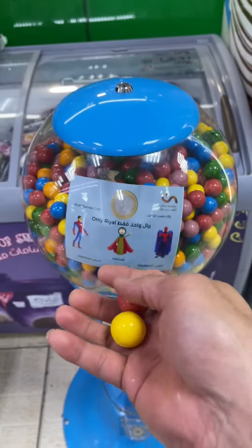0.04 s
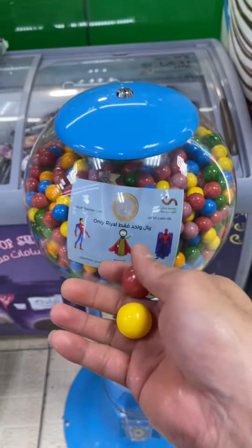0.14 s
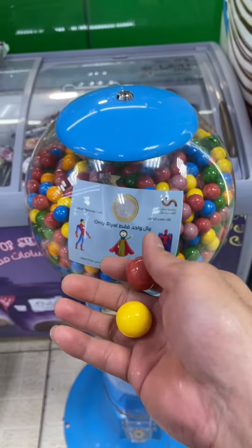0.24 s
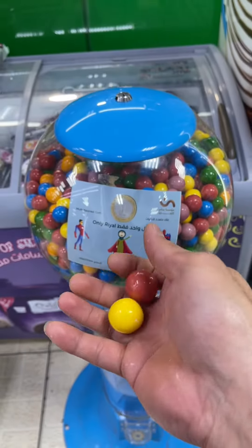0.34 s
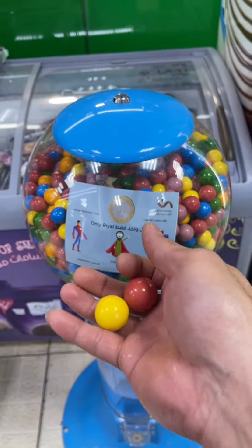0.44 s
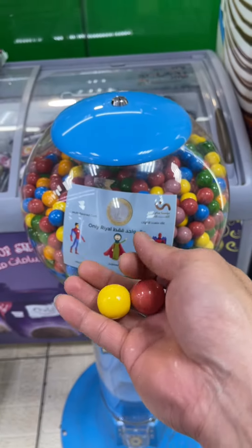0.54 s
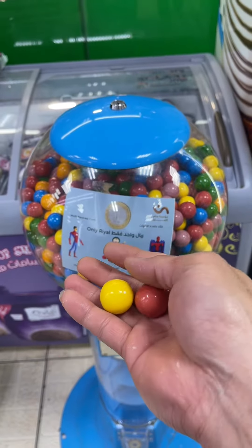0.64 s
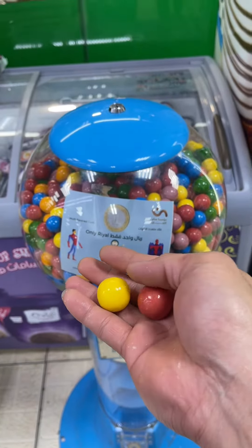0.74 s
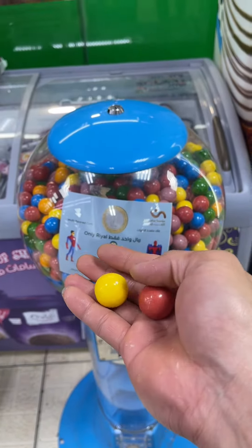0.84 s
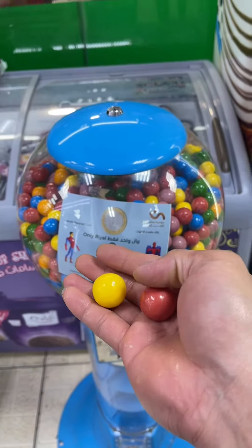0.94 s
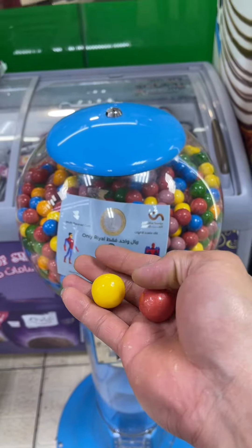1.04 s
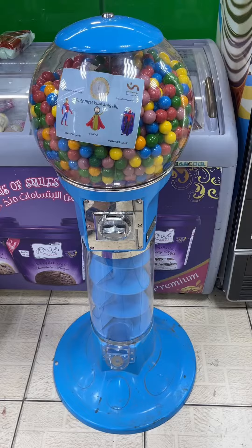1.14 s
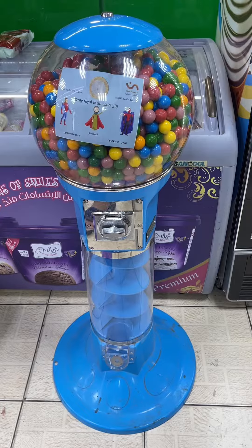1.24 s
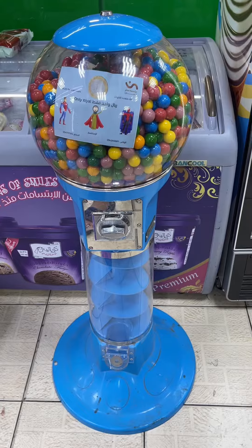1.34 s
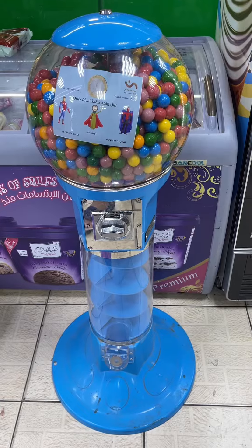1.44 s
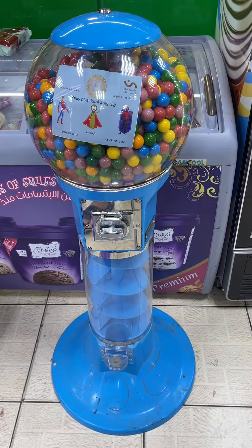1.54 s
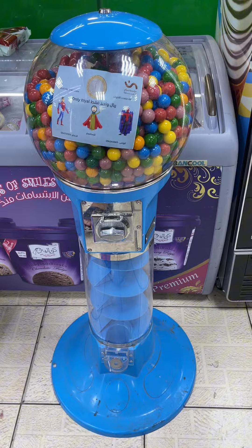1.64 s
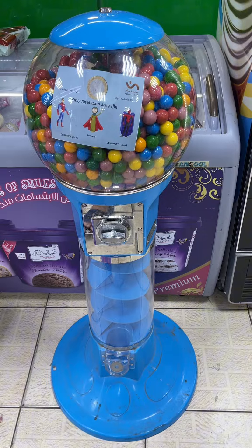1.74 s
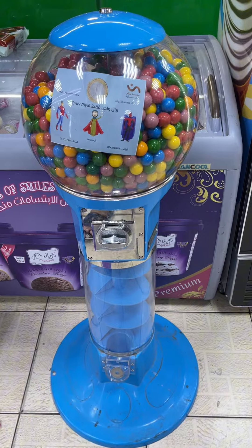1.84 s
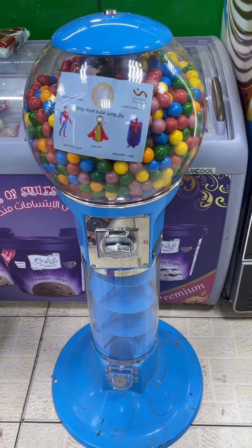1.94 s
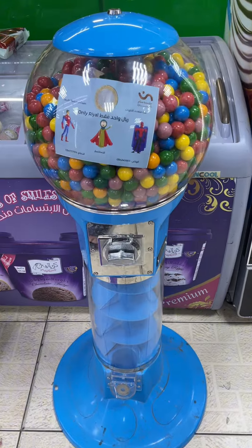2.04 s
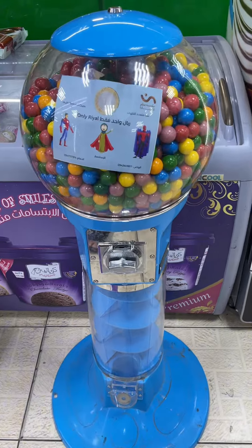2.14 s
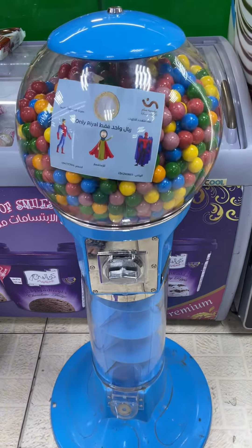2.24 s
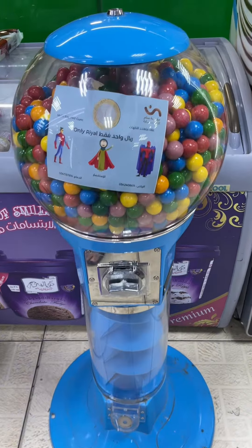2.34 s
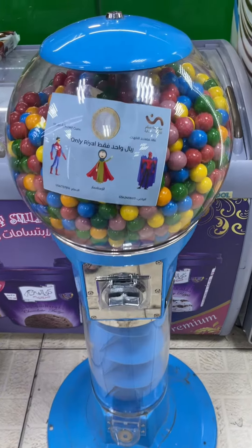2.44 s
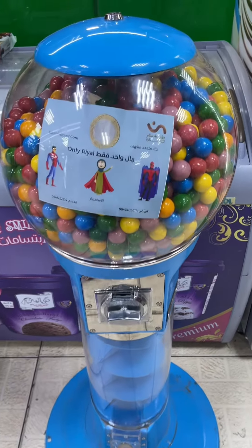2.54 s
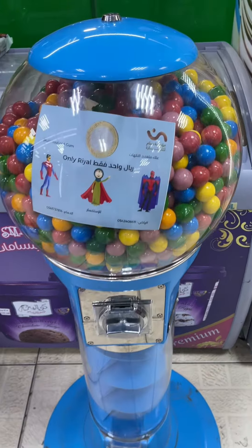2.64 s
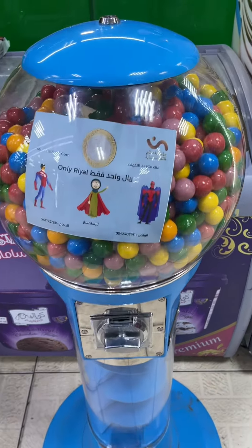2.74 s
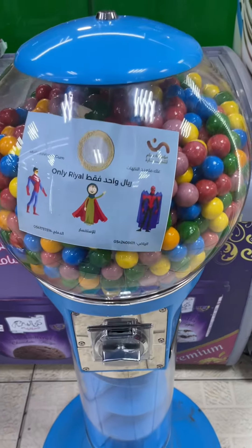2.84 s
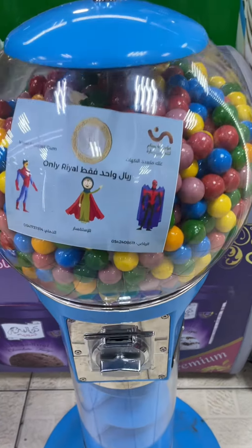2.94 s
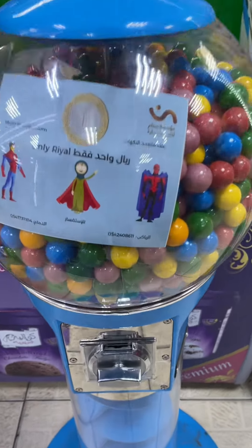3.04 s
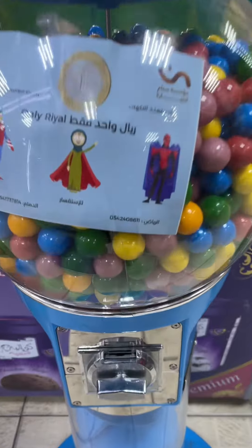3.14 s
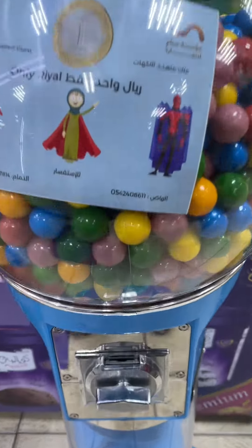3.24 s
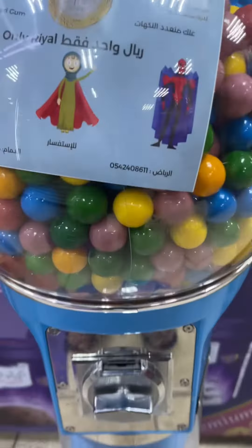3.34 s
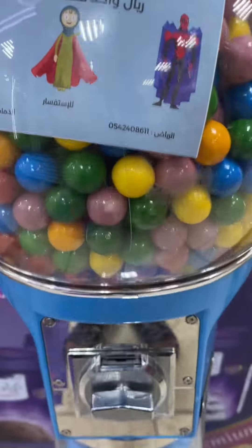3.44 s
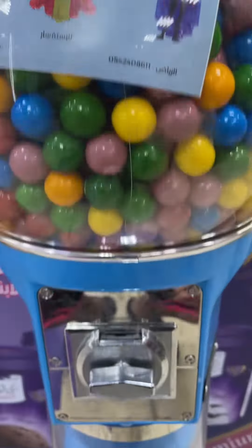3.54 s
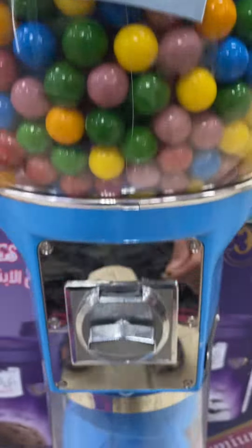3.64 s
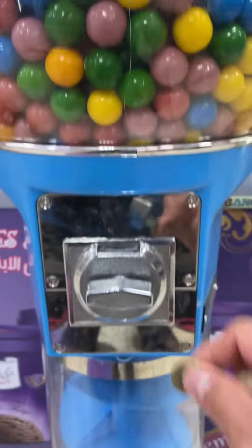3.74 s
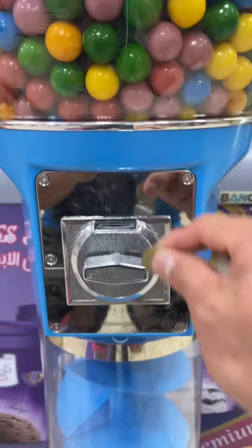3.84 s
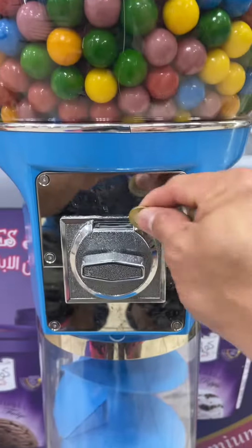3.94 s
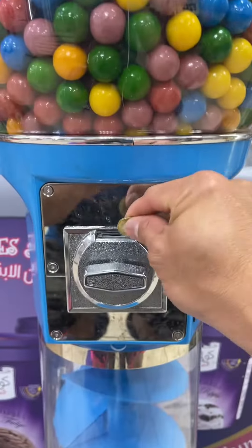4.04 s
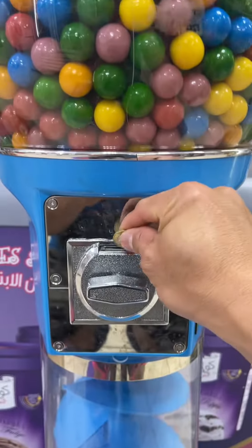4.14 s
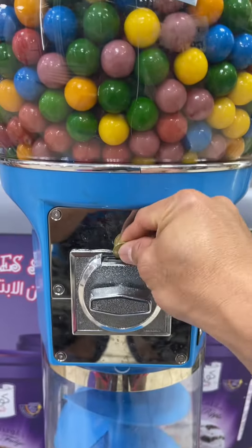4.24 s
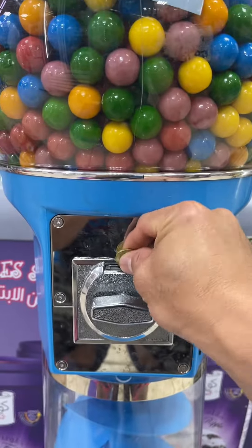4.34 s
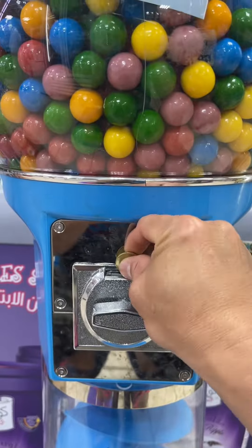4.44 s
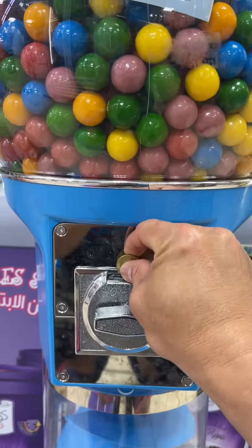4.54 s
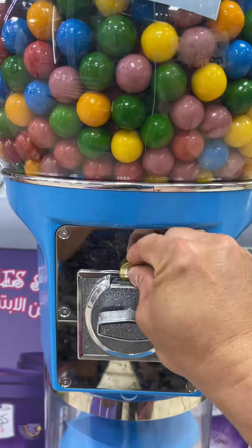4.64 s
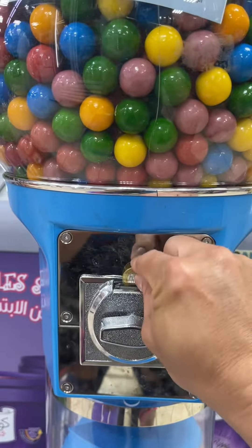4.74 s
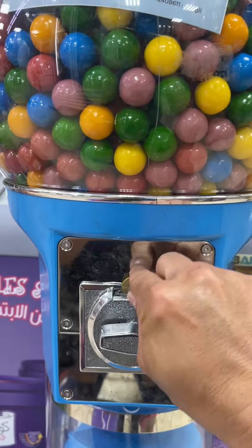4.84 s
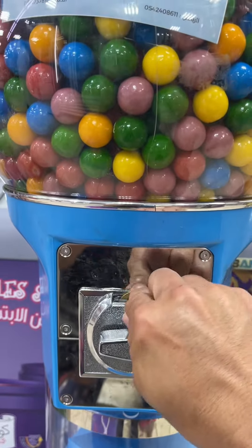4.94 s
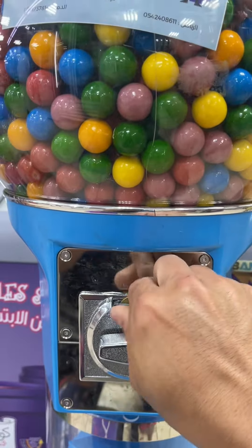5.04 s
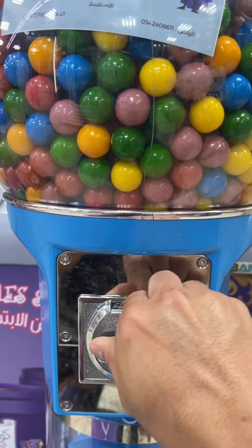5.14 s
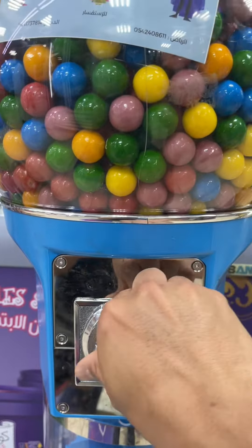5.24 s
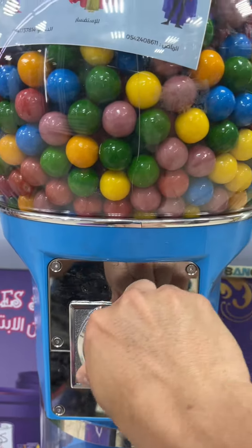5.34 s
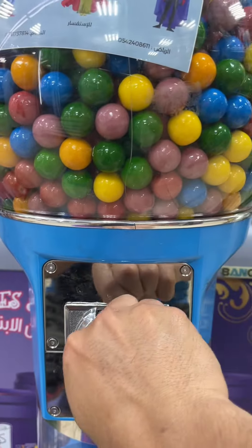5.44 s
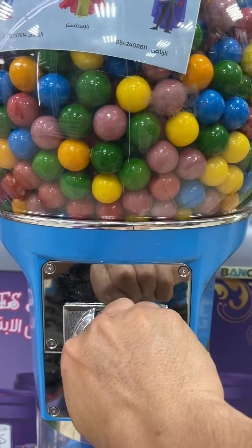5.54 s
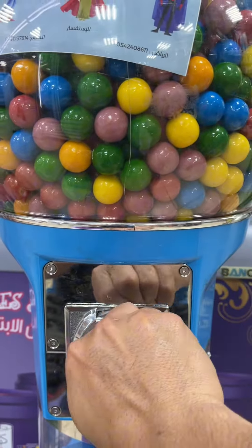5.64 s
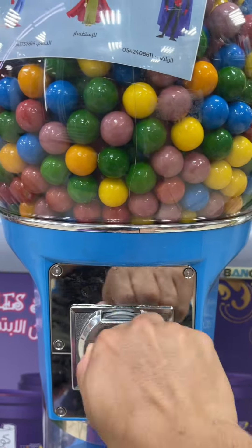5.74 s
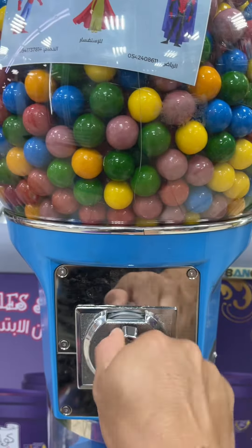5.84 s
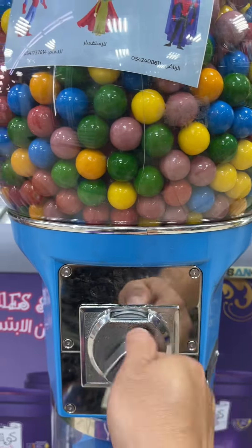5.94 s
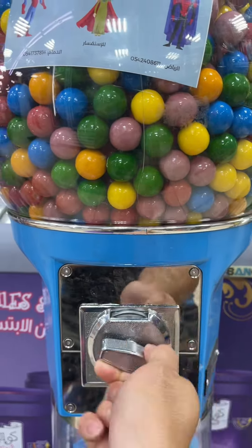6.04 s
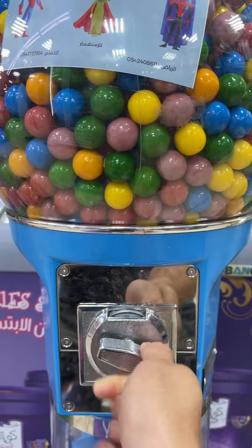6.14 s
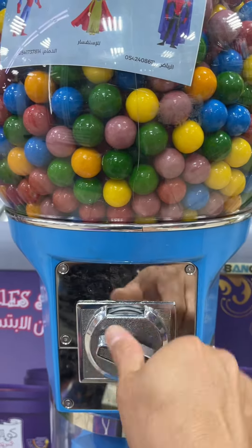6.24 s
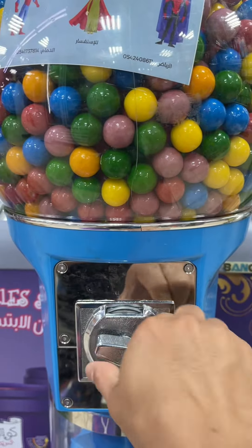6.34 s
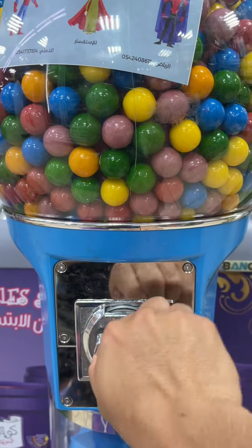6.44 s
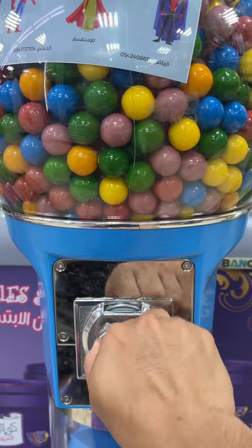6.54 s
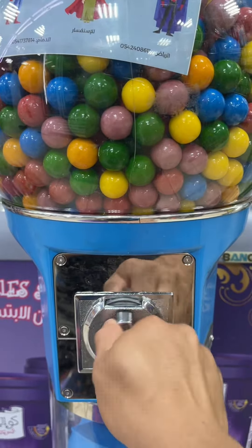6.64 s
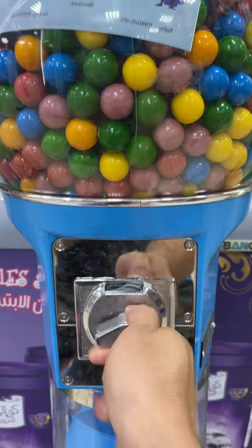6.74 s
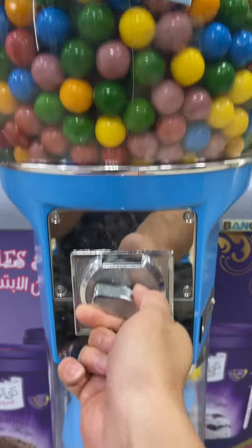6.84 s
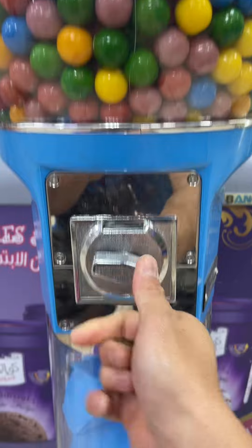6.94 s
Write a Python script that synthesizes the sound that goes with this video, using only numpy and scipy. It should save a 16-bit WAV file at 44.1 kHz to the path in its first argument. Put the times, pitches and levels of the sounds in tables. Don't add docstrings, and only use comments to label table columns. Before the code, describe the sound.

A low, beating freezer hum with cabinet rumble, soft air and thin fan whines runs throughout, heard on a close stereo phone in a small shop. From 0 to 0.7 s gumballs roll and clack in a palm, with dry skin swishes, a tiny squeak and bright ticks. Dull knocks come at 1.0, then an abrupt cut near 1.1 leaves the hum lower, slowly recovering. A loud hollow knock hits at 1.74, a bright coin chink at 2.12, and small ticks around 2.3 to 2.5. Faint handling follows, with plinks at 3.7. The coin taps the slot at 4.12 to 4.22 and lands with a hard clack at 4.83. Light plinks start at 5.3. From 5.6 the crank loads up; loud, bright ratchet snaps with housing clank and gritty scraping peak at 5.8 to 6.0, ease, return at 6.3, then run densest from 6.49 to 6.77 before dying away.

```python
import sys
import numpy as np
from scipy import signal
from scipy.fft import rfft, irfft
from scipy.io import wavfile
from scipy.ndimage import uniform_filter1d

SR = 44100
rng = np.random.default_rng(int(sys.argv[2]) if len(sys.argv) > 2 else 0)


def log_audio(samples):
    frames = np.atleast_2d(samples).T
    limited = np.clip(frames, -1, 1)
    pcm = np.round(limited * 32767).astype(np.int16)
    wavfile.write(sys.argv[1], SR, pcm)


def ratio(d):
    e = np.asarray(d, float) / 20
    return 10 ** e


N = 308700

# (frequency [Hz], density [dB/Hz])
GROWL = [(300, -4.5), (550, 5.5), (1100, 0.5), (1900, 0), (2800, -1), (4200, -8), (6500, -10.5)]
# (frequency [Hz], density [dB/Hz])
SCRAPE = [(3000, -24.5), (4200, -29.5), (6500, -31.5), (8800, -13.5), (10500, -16.5), (12000, -21.5),
          (14000, -38), (17000, -62)]
SHARED = np.array([[1], [0]])
LEAD_S = 0.006
CHANGE_S = 1.1


def on_hz(table, hz):
    f, v = np.transpose(table)
    return np.interp(np.log(hz + 1), np.log(f), v)


def tint(x, table):
    hz = np.fft.rfftfreq(x.shape[-1], 1 / SR)
    closed = [(0.92, -200)] + list(table) + [(SR, -200)]
    y = irfft(rfft(x) * ratio(on_hz(closed, hz)), x.shape[-1])
    return y / y.std()


def walk(rate_hz):
    k = int(SR / rate_hz)
    held = np.repeat(rng.standard_normal(N // k + 1), k)
    return 1.05 * uniform_filter1d(uniform_filter1d(held, k), k)[:N]


def grains(per_s, spread_db):
    contact = rng.random(N) < per_s / SR
    size = ratio(spread_db * np.minimum(rng.exponential(size=N), 3))
    return contact * size * rng.standard_normal((2, N))


def gestures(starts_s, holds_s, levels_db, rise_db_s, fall_db_s):
    t = np.arange(N) / SR
    on, hold, db = (np.array(c)[:, None] for c in (starts_s, holds_s, levels_db))
    rise_db = rise_db_s * np.maximum(on - t, 0)
    fall_db = fall_db_s * np.maximum(t - on - hold, 0)
    return ratio((db - rise_db - fall_db).max(axis=0))


def add(out, s, db, sound):
    i = int((s - LEAD_S) * SR)
    n = min(sound.shape[1], N - i)
    out[:, i:i + n] += sound[:, :n] * ratio(db + 3) / np.abs(sound).max(axis=1, keepdims=True)


def strike(modes, chatter_ms, crack, spread, crack_db, rattle_s=0.01, rattle_db=-60, size=4096):
    t = np.maximum(np.arange(size) / SR - LEAD_S, 0)
    axis = 2j * np.pi * np.fft.rfftfreq(size, 1 / SR)
    hz, db, t60_s = np.repeat(modes, 5, axis=0).T[:, :, None]
    luck = rng.standard_normal((3, len(hz), 1))
    pole = 2j * np.pi * hz * (1 + spread * luck[2]) - np.log(1000) / np.abs(t60_s)
    response = 2j * pole.imag / ((axis - pole.real) ** 2 + pole.imag ** 2)
    body = (ratio(db) * luck[:2])[:, :, 0] @ response
    rise = t / (max(chatter_ms, 0.05) / 1000)
    force = (rise / 2 * np.exp(1 - rise / 2)) ** 2
    force = force + ratio(rattle_db) * np.minimum(rise, 1) * np.exp(-np.log(1000) * t / rattle_s)
    chatter = rng.standard_normal((2, size)) * rng.exponential(size=size) * force
    even = rfft(chatter)
    chatter = irfft(even / np.sqrt(uniform_filter1d(np.abs(even) ** 2, size=size // 55) + 1e-18))
    rung = irfft(rfft(chatter) * body * -1j)
    cracked = tint(chatter, crack)
    return rung / np.abs(rung).max() + ratio(crack_db) * cracked / np.abs(cracked).max()


def gain_control_db():
    # (deepest [s], depth [dB])
    ducks = [
        (6.02, -5),
        (6.86, -10.5),
    ]
    attack_s, release_s = 0.09, 0.15
    drop_db, recover_s = -7.5, 1.32
    t = np.arange(N) / SR
    db = drop_db * (t > CHANGE_S) * np.exp(-np.maximum(t - CHANGE_S, 0) / recover_s)
    for s, depth_db in ducks:
        shape = np.minimum(1 + (t - s) / attack_s, 1 - (t - s) / release_s)
        db = db + depth_db * np.clip(shape, 0, 1)
    return db


def shop():
    # (frequency [Hz], zero phase [s])
    hums = [(59.04, 2.33), (58.57, 2.33), (117.18, 2.57), (119.96, 2.57), (113.96, 2.5)]
    # (level at start [dB], drift [dB/s])
    hum_db = [(-46, 0.9), (-38, -2.5), (-37, -2.5), (-36.5, -1.0), (-57, 0.45)]
    # (frequency [Hz], density [dB/Hz])
    air_colour = [(25, -70), (33, -70), (45, -61), (85, -58), (200, -64), (330, -69.5), (700, -79.5),
                  (1200, -88.5), (2200, -91), (3300, -95.5), (4900, -100), (7500, -98), (10500, -98),
                  (11600, -103), (12200, -124)]
    # (frequency [Hz], width [Hz], level [dB])
    whines = [(281, 24, -49), (540, 40, -66), (1320, 90, -65), (1890, 40, -71.5), (2280, 90, -72),
              (6030, 130, -64.5), (176, 9, -52), (233, 12, -53)]
    fan_on_s = 3.65
    skipped_s = -0.72
    t = np.arange(N) / SR
    shop_s = t + skipped_s * (t < CHANGE_S)
    held_db = gain_control_db()
    hum = 0
    for (hz, s), (db, drift) in zip(hums, hum_db):
        level_db = db + 1.5 + drift * t + 0.44 * held_db + 2.5 * walk(5.5)
        hum = hum + ratio(level_db) * np.sin(2 * np.pi * hz * (shop_s - s))
    out = SHARED * hum
    hz = np.fft.rfftfreq(N, 1 / SR)
    density = ratio(on_hz(air_colour, hz)) * np.sqrt(SR / 2)
    air = rfft(rng.standard_normal((2, N)))
    fans = rfft(rng.standard_normal((2, N)))
    swell_db = held_db + 1.5
    for centre in 20 * 2. ** np.arange(10):
        share = np.cos(np.pi / 2 * np.clip(np.log2((hz + 1) / centre), -1, 1)) ** 2
        follow = np.clip(1.2 - centre / 1500, 0.25, 1)
        out = out + ratio(follow * swell_db + 1.54 * walk(12)) * irfft(air * density * share, N)
    for k, (centre, width, db) in enumerate(whines):
        line = irfft(fans / (1 + (2 * (hz - centre) / width) ** 2), N)
        level_db = db + 2.0 * walk(4.1) + (1 if centre < 400 else 0.4) * held_db
        if k == 2:
            level_db = level_db + np.where(t < fan_on_s, -9.0, 0)
        out = out + ratio(level_db) * line / line.std()
    return out


def palm():
    # (time [s], level [dB], hold [s])
    strokes = [
        (0.0, -38.5, .004),
        (0.29, -52, 0.0091),
        (0.402, -38, 0.015),
        (0.503, -38.5, .004),
        (0.619, -36.5, 0.0065),
    ]
    # (time [s], level [dB], hold [s])
    shifts = [
        (2.97, -73, .004),
        (3.096, -63, .004),
        (3.655, -56, 0.065),
        (3.943, -65, 0.026),
        (4.11, -56, 0.029),
        (4.227, -62, .004),
        (4.535, -61, 0.017),
    ]
    # (frequency [Hz], density [dB/Hz])
    rub_colour = [(600, -8), (1200, -3), (2500, -3.5), (4500, -2.5), (7000, -1.5), (10500, 3.5),
                  (11700, -2.5), (12400, -20), (13200, -42)]
    # (on [s], off [s], level [dB])
    reach = (2.8, 8.6, -61.5)
    # (on [s], off [s], frequency [Hz], harmonic levels [dB])
    squeak = (.172, .245, 2990, [-60, -56, -53])
    t = np.arange(N) / SR
    start, level_db, hold = np.transpose(strokes + shifts)
    moving = gestures(start, hold, level_db, rise_db_s=900, fall_db_s=262)
    moving = moving + ratio(-54) * (t < CHANGE_S)
    reach_on, reach_off, reach_db = reach
    moving = moving + ratio(reach_db) * (t > reach_on) * (t < reach_off)
    rub = tint(grains(per_s=6800, spread_db=-2.0), rub_colour)
    swish = moving * ratio(0.5 + 3.4 * walk(52.8)) * rub
    on, off, hz, levels = squeak
    gate = np.clip(np.minimum(t - on, off - t) / 0.0083, 0, 1)
    tone = sum(ratio(db + 0.5) * np.sin(2 * np.pi * hz * (k + 1) * t) for k, db in enumerate(levels))
    return swish + SHARED * gate * tone


def thud(hz):
    sides = np.array([[1], [0.27]])
    cycles = np.maximum(np.arange(4096) / SR - LEAD_S, 0) * hz
    rise = cycles / 1.92
    return (rise * np.exp(-rise)) ** 3 * np.sin(2 * np.pi * (cycles + 0.27)) * sides


def small_hits():
    # (time [s], level [dB], frequency [Hz])
    knocks = [
        (0.996, -26.5, 540),
        (1.066, -30, 540),
        (1.734, -44, 563),
        (1.7424, -13.5, 580),
        (1.7525, -25, 550),
        (4.843, -35.5, 473),
    ]
    # (time [s], level [dB])
    knock_clicks = [
        (0.996, -32.5),
        (1.0655, -32.5),
        (1.742, -21.5),
    ]
    # (time [s], level [dB], frequency [Hz], t60
    # [s])
    plinks = [(0.0084, -28, 1580, 0.016), (0.0397, -45, 1560, 0.022), (2.3665, -51, 1350, 0.018),
              (3.6612, -35.5, 1690, 0.016), (3.711, -34, 1360, 0.014), (3.727, -44, 1510, 0.02),
              (5.305, -37.5, 1510, 0.01), (5.463, -43, 1540, 0.018), (5.549, -36.5, 1490, 0.013),
              (2.316, -50, 1740, 0.016), (2.345, -49, 1760, .02), (2.3345, -43, 11300, 0.0099),
              (2.336, -29, 10200, 0.014), (2.367, -43, 2870, 0.009), (2.367, -47, 4300, .01),
              (4.1212, -31, 5550, 0.009), (4.219, -38, 11000, .008), (4.533, -46, 3700, .012),
              (4.537, -37, 4150, 0.01), (4.536, -54, 11200, .012), (4.554, -43, 4000, 0.0092)]
    # (time [s], level [dB], frequency [Hz], t60 [s])
    clacks = [
        (0.0094, -30, 2030, 0.0045),
        (0.0414, -39, 2510, 0.0055),
        (0.2829, -24, 3700, 0.0071),
        (.2832, -27, 2320, .005),
        (0.2976, -28, 4300, 0.0064),
        (0.378, -29.5, 2520, 0.0046),
        (.312, -39, 3000, .005),
        (.3855, -30, 2500, 0.0055),
        (3.6854, -44, 2070, 0.005),
    ]
    # (time [s], level [dB], frequency [Hz], t60 [s])
    ticks = [
        (0.0738, -28, 10200, 0.0066),
        (0.3042, -28, 10800, 0.0065),
        (0.609, -21, 11100, 0.0089),
        (2.4942, -57, 11000, 0.006),
        (2.5072, -29, 11000, 0.0048),
        (2.518, -24, 11300, 0.0042),
        (2.5374, -28, 12200, 0.0052),
        (2.9394, -56, 9810, 0.006),
        (2.9794, -40, 11100, 0.006),
        (3.711, -35, 10600, 0.0063),
    ]
    # (frequency [Hz], density [dB/Hz])
    edge_colour = [(700, 22), (1400, -7), (4000, -7), (5200, -26)]
    clack_colour = [(1300, -12), (2000, -1.5), (4500, 0), (6200, -3), (7500, -14), (16000, -22)]
    tick_colour = [(4000, -43), (7000, 5), (9000, 19), (12000, 4), (17000, -48)]
    out = np.zeros((2, N))
    for s, db, hz in knocks:
        add(out, s, db, thud(hz))
    for s, db in knock_clicks:
        add(out, s, db, strike([(1080, 0, 0.006)], 0.05, edge_colour, spread=0.1, crack_db=15))
    for s, db, hz, t60_s in plinks:
        mode = [(hz, 0, min(t60_s, 0.022))]
        add(out, s, db + 0.5, strike(mode, 150 / hz, GROWL[:3], spread=0.0068, crack_db=-54))
    for table, colour in ((clacks, clack_colour), (ticks, tick_colour)):
        for s, db, hz, t60_s in table:
            mode = [(hz, 0, min(t60_s, 0.006))]
            add(out, s, db + 2.5, strike(mode, 0.2, colour, spread=0.08, crack_db=8))
    return out


def coin():
    # (time [s], level [dB], chatter [ms])
    jingles = [
        (2.0098, -51, 3.0),
        (2.0567, -51, 3.3),
        (2.1051, -44, 3.0),
        (2.124, -18, 2.4),
        (2.133, -23.5, 3.8),
        (2.142, -36, 2),
        (2.1515, -41, 2),
        (2.163, -43, 3.7),
        (2.173, -45, 3.0),
        (2.9667, -49, 4),
    ]
    # (time [s], level [dB], crack over ring [dB], chatter [ms])
    slot_taps = [
        (4.1203, -23, 15, 0.37),
        (4.1475, -15.5, 7, 0.44),
        (4.1505, -30, 3, 0.55),
        (4.219, -37, 10, 1),
    ]
    # (time [s], level [dB], crack over ring [dB], chatter [ms])
    drops = [
        (4.823, -29, -1, 2.7),
        (4.829, -25, 2, 1.6),
        (4.8352, -12, 4, 0.43),
        (4.8368, -14.5, -5, 0.5),
        (4.8408, -21, 1, 0.46),
    ]
    # (time [s], level [dB], frequency [Hz], t60 [s])
    coin_rings = [
        (4.836, -40, 12620, .17),
        (6.06, -44, 10350, .5),
    ]
    # (frequency [Hz], level [dB], t60 [s])
    hand_modes = [(7000, -9, 0.011), (10300, 1, 0.052), (11000, -2, 0.053), (12100, 7, 0.054)]
    tap_modes = [(2480, 1.5, 0.018), (3070, 0, .01), (3550, 8.5, 0.016), (4600, -17, 0.014),
                 (5550, -9, 0.01), (7500, -6, .01), (10400, -10, 0.0082), (12500, -18, 0.013)]
    drop_modes = [(714, -13, 0.027), (1720, -12, .016), (2650, -8, 0.021), (3700, -1.5, 0.0097),
                  (4350, -7, 0.0066), (5660, -3.5, 0.013), (7400, -14, 0.0086), (10880, 2, 0.013),
                  (12240, -4, 0.013)]
    # (frequency [Hz], density [dB/Hz])
    chink_colour = [(4500, -20), (6500, 0), (9000, 8), (12500, 9), (15000, -25)]
    slot_crack = [(900, -9), (1600, 0), (3000, 2), (4300, -1), (6500, -5), (8800, 14), (11500, -0.5),
                  (13500, -10), (16000, -28)]
    out = np.zeros((2, N))
    for s, db, ms in jingles:
        add(out, s, db - 3.5, strike(hand_modes, 0.17 * ms, chink_colour, spread=0.0135, crack_db=-4))
    for table, modes in ((slot_taps, tap_modes), (drops, drop_modes)):
        for s, db, crack_db, ms in table:
            hit = strike(modes, ms, slot_crack, spread=0.039, crack_db=crack_db,
                         rattle_s=0.045, rattle_db=-16.5)
            add(out, s, db, hit)
    for s, db, hz, t60_s in coin_rings:
        ring = strike([(hz, 0, t60_s)], 0.69, SCRAPE, spread=0.0036, crack_db=-42.0, size=8192)
        add(out, s, db, ring)
    return out


def toward(table, hz):
    return [(f, db - 6 * abs(np.log2(f / hz)), *rest) for f, db, *rest in table]


def pre_snap_gain():
    # (snap [s], gain just before it [dB])
    snap_gains = [(5.796, 0), (5.858, 2), (6.21, -5), (6.266, 0), (6.312, 1), (6.468, -2), (6.578, -4),
                  (6.665, -3), (6.767, -3), (5.9, -6), (5.931, -2.5), (5.961, -1.5), (5.998, -0.5), (6.49, 1),
                  (6.517, 0), (6.609, -2), (6.64, -4), (6.731, 1.5)]
    approach_s = 0.016
    t = np.arange(N) / SR
    return ratio(sum(db * np.clip(2 + 2 * (t - s) / approach_s, 0, 1) * (t < s) for s, db in snap_gains))


def crank():
    # (time [s], bright level [dB], housing level [dB], loudest housing mode [Hz])
    snaps = [(5.66, -30, -33, 605), (5.7, -33, -41, 610), (5.7269, -20, -30, 496), (5.797, -6, -18, 1840),
             (5.8588, -9.5, -21, 577), (5.9019, -9.5, -17.5, 3340), (5.9314, -5, -13.5, 2080),
             (5.9621, -8, -22.5, 714), (5.9984, -8.5, -19, 1070), (6.0749, -26, -33, 580),
             (6.2681, -22.5, -18.5, 2620), (6.314, -9, -15.5, 2710), (6.3722, -18, -33, 3200),
             (6.4915, -8, -15, 930), (6.5186, -7.5, -19.5, 1500), (6.579, -7.5, -19.5, 574),
             (6.6094, -9, -31, 533), (6.6424, -5.5, -17, 1020), (6.6665, -4.5, -21, 2620),
             (6.6974, -7, -19.5, 1710), (6.732, -8.5, -16.5, 2620), (6.768, -8, -22.5, 650),
             (6.9259, -32, -30, 1120)]
    # (time [s], bright level [dB], housing level [dB], loudest housing mode [Hz])
    scuffs = [(5.5856, -44, -26.5, 900), (5.7506, -18.5, -31, 2100), (5.9741, -14, -18.5, 2680),
              (6.0595, -29, -26, 2160), (6.145, -50, -26, 1535), (6.21, -22, -17.5, 1590),
              (6.2125, -34, -21, 1810), (6.469, -28, -47, 790), (6.8104, -41, -53, 790),
              (6.865, -47, -34, 1550), (5.573, -59, -36, 921), (5.6472, -52, -35.5, 1520),
              (5.7095, -36, -37, 622), (6.133, -48, -31, 1130), (6.835, -50, -32, 1920),
              (6.9137, -47, -40, 1630), (6.9685, -63, -37, 1940)]
    # (frequency [Hz], level [dB], t60 [s])
    pawl = [(4000, -14, 0.012), (4700, -12, 0.013), (5250, -6.5, 0.02), (6120, -16, 0.015),
            (6780, -11, 0.036), (7300, -21, 0.01), (7900, -5, 0.012), (8900, -3, 0.015), (9240, 8.5, 0.012),
            (10060, 6.5, 0.0078), (10600, -1.5, 0.034), (11500, -15, 0.0071), (12600, -5, .012)]
    housing = [(574, -1, 0.043), (750, 2, 0.31), (1070, 13, 0.044), (1510, 4, 0.016), (1804, 19, 0.012),
               (2240, 26.5, 0.0058), (2620, 14, 0.053), (3000, 18, 0.043), (3290, 11.5, 0.093)]
    # (time [s], level [dB], frequency [Hz])
    pawl_rings = [(5.5912, -31, 4200), (5.661, -40, 6070), (5.7095, -35, 6000), (5.7135, -30, 6820),
                  (5.7252, -26, 5800), (5.7546, -14.5, 5940), (5.7962, -14, 6780), (5.8596, -20, 7080),
                  (5.9025, -19, 3530), (5.9336, -7, 5240), (5.9606, -11, 4960), (5.997, -26, 7040),
                  (6.0577, -31, 5340), (6.1465, -40, 3600), (6.2138, -29, 3540), (6.2684, -12, 5440),
                  (6.3151, -12, 3700), (6.372, -30, 3550), (6.4687, -27, 5100), (6.493, -6, 6020),
                  (6.52, -12, 6030), (6.58, -6, 6100), (6.6115, -16, 6250), (6.6408, 0, 7930),
                  (6.6682, -10, 6120), (6.6977, -9, 5250), (6.732, -0.5, 5260), (6.7674, -6.5, 5640),
                  (6.8813, -36, 3720), (6.9272, -23, 3480), (6.9307, -22, 3670)]
    # (time [s], level [dB], frequency [Hz])
    low_rings = [(5.592, -28, 896), (5.726, -21, 550), (5.752, -22, 645), (5.796, -16.5, 980),
                 (5.858, -31, 550), (5.901, -13, 610), (5.931, -16, 1293), (5.961, -19, 770),
                 (6.001, -23, 1060), (6.211, -28, 1107), (6.269, -35, 711), (6.314, -20.5, 584),
                 (6.493, -11, 555), (6.519, -16, 686), (6.581, -20, 553), (6.612, -17.5, 553),
                 (6.644, -27, 991), (6.667, -22, 1047), (6.699, -18, 600), (6.733, -12, 727),
                 (6.77, -24, 606), (6.927, -30, 1134)]
    high_rings = [(5.5907, -19, 1670), (5.731, -22, 1640), (5.7524, -33, 2100), (5.7967, -19.5, 2220),
                  (5.859, -15, 2750), (5.904, -15, 3400), (5.9313, -21, 2100), (5.9614, -18, 2490),
                  (6.0003, -14, 1690), (6.214, -12, 1790), (6.2714, -18, 2700), (6.313, -15, 2700),
                  (6.3729, -21, 3270), (6.4907, -13, 3390), (6.5186, -14, 2090), (6.5795, -16, 1720),
                  (6.6096, -15, 1630), (6.6416, -15.5, 1975), (6.6663, -17, 2560), (6.698, -14, 1690),
                  (6.732, -6, 2620), (6.7683, -14, 2510), (6.9273, -22, 1690)]
    # (time [s], hold [s], growl level [dB], scrape level [dB])
    pushes = [
        (5.577, 0.15, -51, -67),
        (5.72, 0.067, -38, -56),
        (5.909, 0.068, -32, -39.5),
        (6.06, 0.084, -41, -48.5),
        (6.28, 0.083, -41.5, -42),
        (6.496, 0.025, -35, -63),
        (6.612, 0.15, -30.5, -39.5),
        (6.87, 0.082, -42, -57),
    ]
    out = np.zeros((2, N))
    for table, ms, rattle_s in ((snaps, 3.44, 0.096), (scuffs, 5.6, 0.17)):
        for s, bright_db, housing_db, hz in table:
            bright = strike(pawl, 0.23 * ms, SCRAPE, spread=0.043, crack_db=8.5,
                            rattle_s=rattle_s, rattle_db=-18)
            add(out, s, bright_db + 5.5, bright)
            modes = toward(housing, hz) + [(hz, 8, 0.045)]
            low = strike(modes, 0.4 * ms, toward(GROWL, hz), spread=0.0417, crack_db=5.0,
                         rattle_s=rattle_s, rattle_db=-2.5, size=8192)
            add(out, s, housing_db + 2.0, low)
    for s, db, hz in pawl_rings:
        add(out, s, db - 7.5, strike([(hz, 0, 0.012)], 0.32, SCRAPE, spread=0.036, crack_db=-1.5))
    for table, t60_s in ((low_rings, 0.045), (high_rings, 0.03)):
        for s, db, hz in table:
            ring = strike([(hz, 0, t60_s)], 0.42, GROWL, spread=0.025, crack_db=-14.5)
            add(out, s - 0.001, db - 8.5, ring)
    on, hold, growl_db, scrape_db = np.transpose(pushes)
    growl = gestures(on, hold, growl_db, rise_db_s=298, fall_db_s=152)
    scrape = gestures(on, hold, scrape_db, rise_db_s=298, fall_db_s=152)
    out += growl * ratio(1 + 2 * walk(40)) * tint(grains(per_s=4000, spread_db=2.5), GROWL)
    out += scrape * ratio(4.0 + 2.5 * walk(60)) * tint(grains(per_s=9000, spread_db=1.5), SCRAPE[:-2])
    return out


def scene():
    # (frequency [Hz], level [dB])
    room_colour = [(250, 3), (4000, 13), (12300, 13)]
    room_t60_s, room_db = 0.16, -15.5
    near = crank() + coin() + small_hits()
    t = np.arange(int(0.5 * SR)) / SR
    tail = tint(rng.standard_normal((2, len(t))), room_colour)
    tail = tail * np.exp(-np.log(1000) * t / room_t60_s) * (t > 0.004)
    tail = tail / np.sqrt((tail ** 2).sum(axis=1, keepdims=True))
    wet = signal.fftconvolve(near, tail, axes=1)[:, :N]
    return pre_snap_gain() * (near + ratio(room_db) * wet) + palm() + shop()


def low_pass(x):
    return signal.sosfilt(signal.butter(12, 16470, fs=SR, output="sos"), x)


def record(dry):
    # (frequency [Hz], left lead [rad])
    port_phase = [(20, 0), (130, -.12), (400, -.6), (600, -1.3), (900, -.5), (1400, -.1), (1900, .1),
                  (2400, .5), (3300, -1), (4500, -3.2), (5000, -2.5), (5750, -.1), (6250, .25), (8050, 2.4),
                  (8550, 3.07), (9350, 3.2), (9800, 3.72), (12300, 6.25)]
    # (frequency [Hz], likeness [0-1])
    port_like = [(20, .999), (130, .99), (350, .96), (800, .45), (1200, .4), (1600, .87), (1900, .92),
                 (2600, .5), (3500, .15), (4300, .25), (4900, .85), (5350, .68), (6000, .97), (7000, .8),
                 (8050, .87), (8500, .999), (9450, .999), (9900, .92), (12500, .91)]
    # (frequency [Hz], left minus right [dB])
    port_pan = [(100, 0), (200, -.5), (500, -3), (900, -6), (1250, -4), (1600, -1), (4300, -2), (5300, 1.5),
                (6500, 0), (16000, 0)]
    # (frequency [Hz], gain [dB])
    mic_colour = [(3600, 0), (4400, 1.5), (5200, 0.5), (7200, 0.5), (8300, -2.5), (9400, 1.5),
                  (10000, -2.5), (12400, -2.5), (13200, -3), (13600, -12), (16000, -21), (16600, -70)]
    # (time [s], jump level [dB], direction)
    jumps = [
        (1.0938, -22.5, -0.7),
        (1.115, -28.5, -0.92),
    ]
    hz = np.fft.rfftfreq(N, 1 / SR)
    like = np.clip(on_hz(port_like, hz), 0, 1)
    side = np.array([[1], [-1]])
    shared, apart = rfft(dry)
    ports = np.sqrt((1 + like) / 2) * shared + side * np.sqrt((1 - like) / 2) * apart
    ports = ports * ratio(side * on_hz(port_pan, hz) / 2) * np.exp(0.5j * side * on_hz(port_phase, hz))
    out = 1.655 * np.tanh(irfft(ports, N) / 1.551)
    out = irfft(rfft(out) * ratio(on_hz(mic_colour, hz)), N)
    t = np.arange(N) / SR
    for s, db, sign in jumps:
        out = out + sign * ratio(db) * (t >= s) * np.exp(-np.maximum(t - s, 0) / 0.002)
    return low_pass(np.clip(out, -0.95, 0.95))


dry = scene()
out = record(dry)
log_audio(out)
```